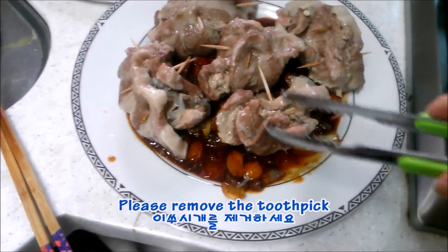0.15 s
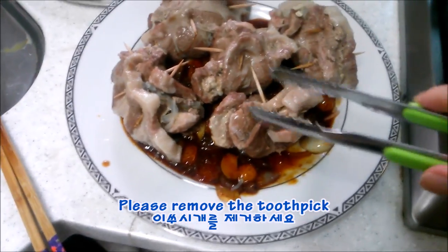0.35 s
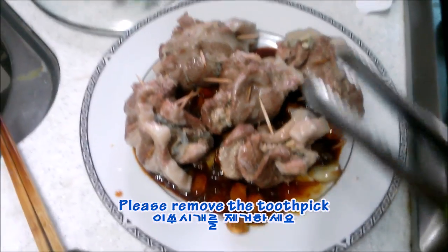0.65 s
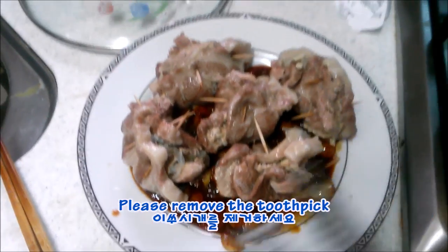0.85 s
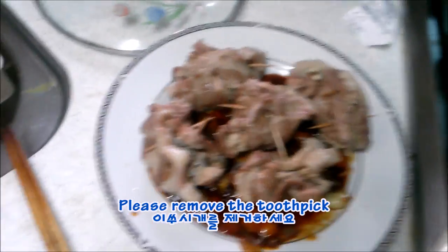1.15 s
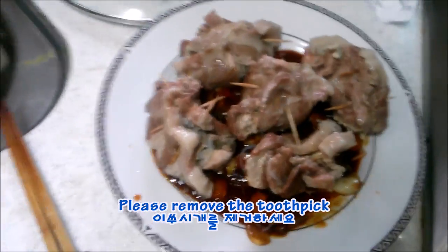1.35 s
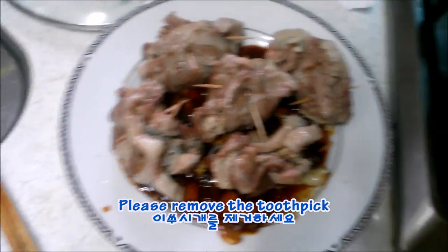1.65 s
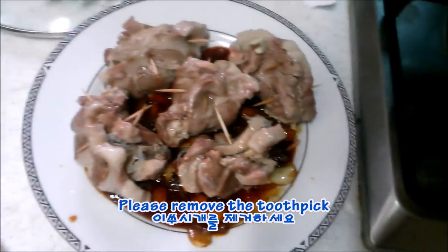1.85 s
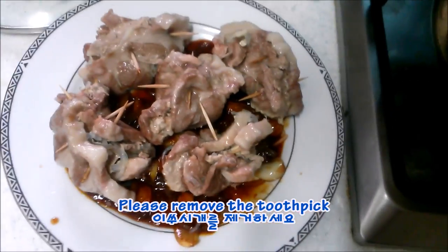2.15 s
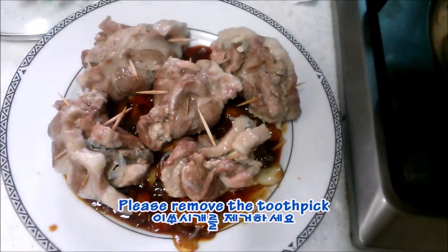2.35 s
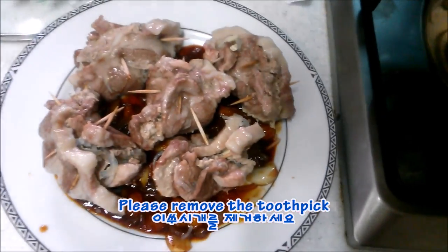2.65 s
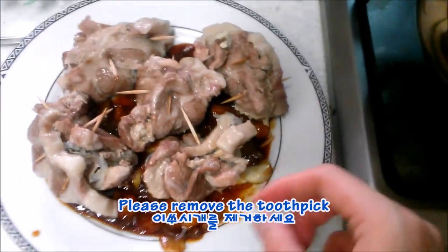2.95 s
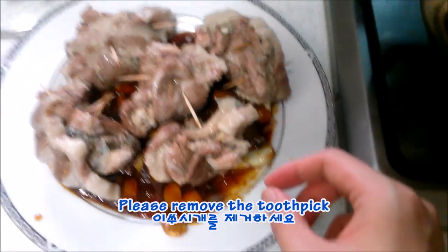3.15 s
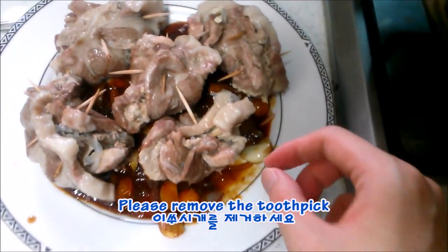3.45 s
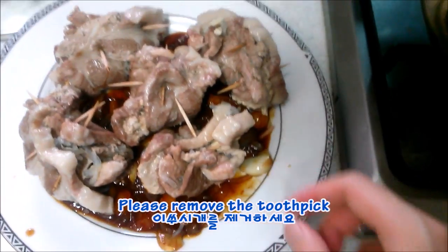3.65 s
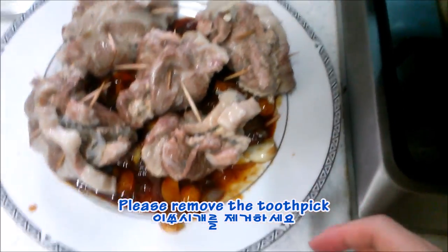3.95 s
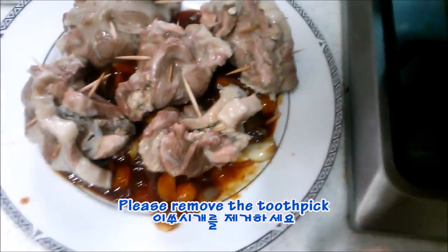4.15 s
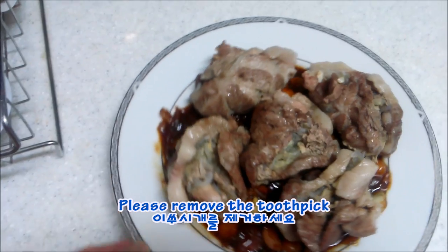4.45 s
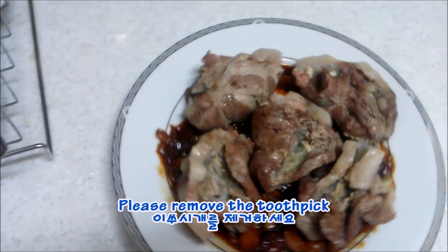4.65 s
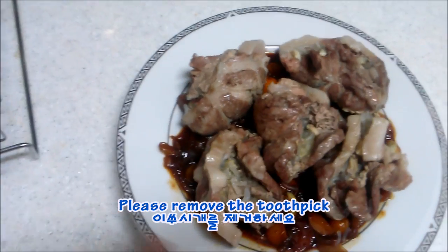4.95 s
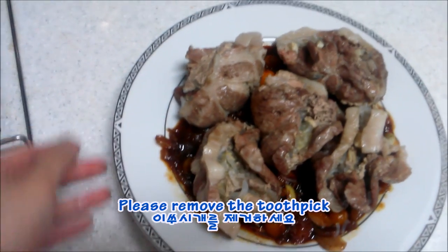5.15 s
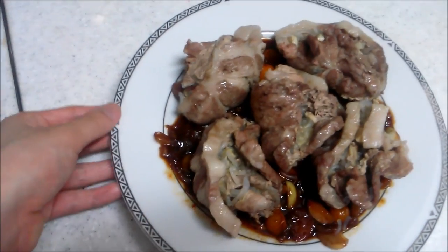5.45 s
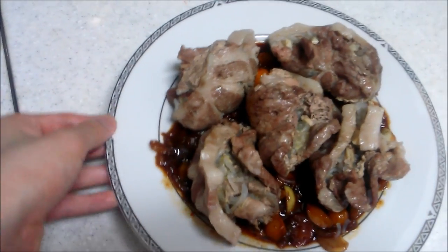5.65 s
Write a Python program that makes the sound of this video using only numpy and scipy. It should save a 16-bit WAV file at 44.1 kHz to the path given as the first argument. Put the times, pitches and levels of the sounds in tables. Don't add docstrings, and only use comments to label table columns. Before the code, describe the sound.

A small, hard-surfaced kitchen heard through a close handheld microphone, with steady fridge hum and soft low rumble from a moving hand. A small bright metal tick comes at 0.16 s and a dull double click of tongs near 0.55 s. A faint airy swish passes around 1.2 s. At 1.7 s the tongs drop lightly, followed by irregular clacks until about 2.4 s, and a few tiny ticks at 2.6-2.7 s. It stays quiet, with one soft touch near 3.8 s. At 4.12 s the scene cuts to a thinner room: dry snaps, then a heavy plate lands at 4.18 and 4.22 s with short woody booms. It drags, gritty and increasingly singing, from 4.3 to 4.85 s. Loud, hard ceramic knocks rattle at 5.09-5.16 s, a sharp clink follows at 5.29 s, then a fading scrape until 5.56 s, a tiny slip at 5.6 s, and faint hiss.

```python
import sys
import numpy as np
from scipy import signal
from scipy.fft import rfft, irfft
from scipy.io import wavfile
from scipy.ndimage import uniform_filter1d

SR = 44100
rng = np.random.default_rng(int(sys.argv[2]) if len(sys.argv) > 2 else 0)


def pcm_store(signal):
    levels = np.round(np.clip(np.atleast_2d(signal), -1, 1) * 32767)
    wavfile.write(sys.argv[1], SR, levels.astype(np.int16).T)


def to_linear_factor(level_db):
    exponent = np.asarray(level_db, float) / 20
    return 10 ** exponent


N = 256485
CHANGE_S = 4.12

# start in seconds, peak in dB, bass shelf in dB, treble shelf in dB,
# echo decay time T60 in seconds.
TONG_TICKS = [
    (0.159, -35, -5.5, -3.5, 0.61),
    (0.5744, -48.5, 11, -20, 0.39),
    (1.9728, -41.5, -2, -16, 1),
    (2.6427, -41.5, -13, -15, 0.59),
    (3.7728, -48.5, -2, -43, 0.46),
]
TONG_CLACKS = [(1.776, -42, -2, -14, 0.086), (1.7805, -37, -2.5, -4, 0.19), (1.803, -46.5, -2, -18, 0.22),
               (1.8565, -39.5, -8, -9, 0.48), (1.919, -46, -6, -13, 0.2), (1.926, -44, -6, -12, 0.18),
               (1.934, -35.5, -10, -19, 0.17), (1.943, -40.5, -3, -20, 0.11), (1.97, -35, -6, -10.5, 0.12),
               (1.984, -42, 2, -17, 0.18), (2.072, -30, -19, -21.5, 0.13), (2.089, -37, -5, -26, 0.29),
               (2.153, -47, -4, -12.5, 0.76), (2.335, -42, -2.5, -26, 0.081),
               (2.367, -33, -13.5, -28, 0.23)]
TONG_PINCHES = [
    (0.522, -48.5, -4, 2, 0.21),
    (0.527, -40.5, -11, -5, 0.3),
]
TONG_DROP = [
    (1.706, -32, -1, 2.9, 0.25),
    (1.7095, -33.5, 0.5, 3.5, .2),
    (1.7165, -36.5, 3, -2, 0.19),
    (1.73, -42, -1.5, 0, .2),
]
TONG_FLICK = [
    (2.7178, -51, 0, 0, 0.82),
    (2.7182, -52.5, 0, 0, 0.06),
]
# start in seconds, peak in dB, bass shelf in dB,
# treble shelf in dB, echo decay time T60 in seconds.
PLATE_THUDS = [
    (4.177, -15.5, 1.8, 4.2, 0.2),
    (4.217, -24, -0.29, 4.8, 0.2),
    (4.2245, -20, 0.33, 4.8, 0.196),
    (4.237, -23, -2, 4.3, 0.18),
    (4.262, -31.5, -1.8, 2.2, 0.69),
    (5.152, -26.5, 2, 2.2, 0.19),
]
SOFT_TOUCHES = [
    (1.491, -48.5, 5.5, -28, 0.19),
    (4.04, -62, 9, -26, 0.91),
    (4.964, -47, -9, -30, 0.35),
    (5.047, -57.5, 9.5, -30, .3),
    (5.071, -53.5, -14, 11, .2),
]
PLATE_KNOCKS = [
    (4.461, -44, -7, 10, 0.16),
    (4.51, -43, -8, 12, 0.11),
    (4.844, -37, -11, -3.5, 0.3),
    (5.092, -24.5, -1, 10, 0.28),
    (5.099, -21, -4, 7, 0.22),
    (5.108, -21.5, -21, -8, 0.23),
    (5.146, -15.5, -15, -7, 0.043),
]
EDGE_TAPS = [
    (5.2922, -25, -5.5, 1.4, 0.148),
    (5.405, -53, -12, 14, 0.057),
]
GRIT_CRACKS = [(4.4186, -42.5, -17, 5, 0.14), (4.455, -42.5, -6, 12, 0.31), (4.51, -43, -18, 13, 0.12),
               (4.6324, -49, -12, 5, 0.042), (4.6725, -57, -6, -4, .08), (4.395, -43, -9, 8, .06),
               (4.5, -48, -14, 6, .06), (4.545, -51, -14, 8, .06), (4.752, -53, -10, 3, .07),
               (4.7966, -54, -12, 8.1, 0.097), (4.8728, -42, -14, 1, 0.085), (4.893, -41.5, -8, -5, 0.076)]

# frequency in Hz, level in dB.
TICK_COLOUR = [(410, -18), (700, -4.5), (898, -12), (1140, -9), (1420, -6), (2560, -9.5), (4610, -8.5),
               (8310, -4.5), (10200, -15), (11300, -20), (16000, -29)]
CLACK_COLOUR = [(88, -2), (150, -8), (309, 0.5), (534, -4.5), (689, -2.5), (1260, -8.5), (1690, -1.5),
                (2700, -9), (4000, -17.5), (4490, -15.5), (16000, -42)]
FLICK_COLOUR = [(300, -40), (1300, -1), (3500, -3), (5600, -9.5), (6700, -4), (7900, -5), (9200, -17),
                (16000, -28)]
THUD_COLOUR = [(15, -46), (25, 3), (60, 5.5), (108, -1.5), (145, -21), (180, 1.5), (263, -3.5), (317, 1.5),
               (384, -6), (463, -5), (2050, -14.5), (4490, -13.5), (7920, -18), (16000, -47.5)]
KNOCK_COLOUR = [(35, -48.5), (60, 5.5), (862, -0.5), (991, -5.5), (1310, 6), (2000, -7), (3190, 1.5),
                (3760, -4.5), (6900, -6.5), (11300, -24.5), (14900, -28), (16000, -45)]
DRAG_COLOUR = [(88, -57), (150, -34), (259, 6), (297, -6), (406, 0.5), (475, -13), (660, -4.5), (900, 1),
               (1100, -2.5), (1450, -3.5), (4860, -2), (16000, -20.5)]
KITCHEN_COLOUR = [(35, -2.5), (60, -2.5), (81, -20.5), (118, -28), (146, -14.5), (363, -9), (398, -14),
                  (732, -19), (1090, -16), (1700, -20), (3040, -26), (3420, -25.5), (16000, -50.5)]
QUIET_COLOUR = [(35, -29), (60, 4), (281, -12.5), (400, -7), (660, -20.5), (950, -10), (1200, -18.5),
                (1470, 1.5), (1700, -9), (2140, -7), (3040, -10.5), (7940, -2.5), (16000, -31)]

# frequency in Hz, width in Hz, level in dB.
TONG_MODES = [(4600, 200, -4), (4970, 320, -13), (7130, 77, -1), (8140, 150, -1.5), (8600, 38, 8),
              (7900, 360, -38), (7800, 140, -5)]
COUNTER_MODES = [(326.4, 13, 5), (489, 13, 4.5), (683, 12, 4.5), (1121, 15, 0.5), (1590, 58, 0.5),
                 (2006, 110, -4.5), (2930, 40, -7), (3160, 120, -9.5)]
HINGE_MODES = [(785, 20, 0), (1260, 79, -9), (1550, 46, -1), (2116, 48, 0), (2840, 40, -8), (3870, 67, -16),
               (5450, 80, -19), (6800, 50, -24)]
HANDLE_MODES = [(309, 20.5, 8), (665, 18, 4.5), (1710, 32, -13), (2040, 58, -2), (2410, 37, -10),
                (2690, 47, -3), (3060, 39, -1.5), (4440, 100, -12), (5080, 39, -13), (5980, 34, -14),
                (7030, 79, -15.5), (8400, 58, -23)]
TIP_MODES = [(3380, 70, -2), (4000, 200, -4), (7190, 65, 4), (7700, 90, 0)]
TABLE_MODES = [(189.6, 17, 7), (316.7, 14, 6.5), (472, 16, 3), (554, 27, -4), (729, 28, -1.5), (883, 20, 2),
               (1188, 16, -1), (1377, 22, -6)]
PLATE_MODES = [(592, 30, -5), (835, 35, -5), (1170, 50, -4), (1290, 60, -2), (1445, 50, -7), (2385, 45, -7),
               (2923, 35, -6), (3138, 40, 0), (3446, 40, -1), (3940, 35, -7), (4440, 35, -9),
               (5460, 50, -4), (6800, 60, -12), (7810, 50, -10)]
EDGE_MODES = [(1113, 61, -2.5), (1710, 40, -5.5), (2730, 70, 1), (3140, 54, -0.5), (3700, 65, -11),
              (4060, 81, -6), (5090, 98, -7), (5920, 60, -6), (6950, 190, -8.5)]
GRIT_MODES = [(6080, 140, 0), (6580, 120, 5), (7300, 120, 1), (8700, 100, -2), (9330, 140, -1)]
FRIDGE_MODES = [
    [361, 12, -4.5],
    [1094, 50, -2],
    [3090, 63, -14],
    (7170, 1080, -22.5),
]
# frequency in Hz, width in Hz, level in dB.
FOOT_MODES = [(192, 14, 1), (231, 12, -2.5), (315.4, 30, 0), (548, 36, -8.5), (693, 38, -1), (845, 21, -13),
              (1210, 27, -11.5)]
SLAB_MODES = [(121.6, 10.7, 2), (186, 12, -1.5), (231, 15, -3), (317, 14, -1), (466, 15.7, -2),
              (552, 12, -8), (730, 26, -10), (885, 18, -5), (907, 18, -5)]
GLAZE_MODES = [(1156, 40, -12), (1323, 32, -9), (1484, 52, -11), (2380, 45, -9), (2920, 35, -4),
               (3133, 40, 1.5), (3280, 35, -5), (3438, 30, 0), (3950, 60, -8), (5500, 58, -8.5),
               (7010, 90, -7), (2696, 35, -7), (4790, 45, -7), (5020, 31, -4)]
DISH_MODES = [(584, 23, 0), (728, 25, -5), (845, 40, -3), (1000, 45, -6), (1160, 40, 0), (1293, 74, 2.5),
              (1410, 50, -4), (404, 43, 0), (1657, 45, 0.5), (2180, 35, -9), (4200, 40, -6)]
LIP_MODES = [(1110, 190, -6.5), (2690, 110, 1), (3080, 76, -8), (4150, 140, -6), (5100, 180, -7.5),
             (5830, 230, -9), (6780, 300, -11)]
SHRILL_MODES = [(15150, 60, 0), (15400, 80, -4)]
# frequency in Hz, width in Hz, level in dB.
RIM_MODES = [
    [(990, 60, -6), (1550, 260, 3), (2000, 220, 0), (3720, 170, 1), (4900, 220, 1), (5880, 150, 0),
     (7150, 170, 0), (8650, 140, 0), (10400, 300, -11)],
    [(1490, 150, -2), (3160, 120, 0), (4720, 200, -4)],
    [(1500, 200, -8), (2750, 160, 1), (6600, 2500, -8)],
    [(6500, 2500, 0)],
]

# start in seconds, peak in dB, push length in ms.
SETTLES = [
    (4.178, -26, 0.66),
    (4.1815, -23.5, 0.62),
    (4.186, -30.5, 1),
    (4.195, -31.5, 0.4),
    (4.208, -26, 0.38),
]
LANDS = [
    (4.221, -38, .5),
    (4.2255, -27, 0.78),
    (4.2285, -24, 1.5),
    (4.236, -35, 1.8),
    (4.245, -31, 0.52),
    (4.268, -28.5, 0.88),
    (5.163, -31, 0.44),
    (5.173, -34.5, 0.89),
]
CHATTERS = [(5.0925, -23.5, 0.07), (5.099, -21, 0.058), (5.104, -24, 0.15), (5.107, -20, 0.08),
            (5.1115, -22, 0.075), (5.121, -21, 0.14), (5.125, -26, 0.1), (5.134, -29, 0.12),
            (5.1475, -29, .1), (5.151, -34, .1), (5.193, -38, 0.11), (4.845, -39, 0.073),
            (4.858, -41, 0.34)]
WOBBLES = [
    (5.093, -30.5, .3),
    (5.103, -39, .3),
    (5.116, -28.5, 0.2),
    (5.129, -26, 0.26),
    (5.137, -32, 0.34),
    (5.143, -31, 0.38),
    (5.154, -24.5, 0.27),
    (5.16, -33, 0.51),
]
CLINKS = [
    (5.2926, -19.5, 0.075),
    (5.2941, -23.5, .07),
    (5.2985, -30, .1),
    (5.3015, -21, 0.16),
    (5.309, -30, 0.11),
    (5.3135, -35, .1),
    (5.3205, -36, 0.16),
]
WHISTLES = [
    (5.0925, -43, .05),
    (5.1, -47, .05),
    (5.108, -50, .05),
]
# start in seconds, peak in dB, pitch in Hz, T60 in seconds.
BOOMS = [
    (4.1833, -24, 104, 0.093),
    (4.2224, -22, 104.3, 0.1),
    (4.2631, -28, 112.4, 0.143),
]
# start in seconds, peak in dB, pitch in Hz.
SNAPS = [
    (4.1261, -45, 3500),
    (4.1458, -23, 4300),
    (4.1599, -38, 2500),
    (4.1658, -14, 4500),
]
# start in seconds, end in seconds, level in dB, sag in dB per second,
# brightness in dB.
DRAGS = [
    (4.288, 4.85, -47.5, -0.5, -8),
    (5.21, 5.3, -54, 44, 13.5),
    (5.324, 5.558, -52.5, 20, 5),
    (5.586, 5.612, -63.5, 10, 18),
]
# frequency in Hz, peak level in dB.
HUM_LINES = [(371.4, -66.5), (1104, -81), (1287, -79.5), (2950, -98), (3009, -79.5)]
# centre in seconds, peak in dB, width in seconds.
RUMBLE_SWELLS = [(.2, -56.5, 0.069), (.45, -52.5, 0.22), (.89, -55.5, 0.093), (1.3, -52.5, 0.15),
                 (1.55, -59, 0.19), (1.93, -56, 0.13), (2.21, -47.5, 0.098), (2.38, -60, 0.12),
                 (2.63, -56, 0.06), (3.22, -60, 0.052), (3.72, -61, 0.23), (4.25, -53, .06),
                 (4.42, -53, 0.087), (4.66, -52.5, 0.07), (5.17, -49, 0.11), (5.5, -64, 0.15),
                 (4.86, -66, 0.13)]
# centre in seconds, length in seconds, share of lines kept.
STARVED = [(.136, .042, .07), (.306, .035, .15), (.624, .04, .08), (.9, .036, .1), (1.63, .04, .1),
           (1.755, .035, .16), (1.842, .035, .3), (2.52, .04, .12), (3.012, .04, .1), (4.206, .028, .12),
           (4.293, .03, .12), (4.698, .03, .2), (4.839, .05, .16), (5.1045, .026, .09), (5.23, .03, .25),
           (5.34, .03, .25), (5.606, .05, .07), (5.765, .03, .2)]


def level(x, db):
    return x * to_linear_factor(db) / np.sqrt(np.mean(x ** 2) + 1e-20)


def gains_db(points, hz):
    f, db = np.transpose(points)
    return np.interp(np.log(hz + 1), np.log(f), db)


def colour(x, points):
    hz = np.arange(len(x) // 2 + 1) * SR / len(x)
    return irfft(rfft(x) * to_linear_factor(gains_db(points, hz)), len(x))


def band(x, low_hz, high_hz):
    return signal.sosfilt(signal.butter(2, [low_hz, high_hz], "bandpass", fs=SR, output="sos"), x)


def shelve(x, bass_hz, bass_gain, treble_hz, treble_gain):
    low = signal.butter(1, bass_hz, fs=SR)
    high = signal.butter(1, treble_hz, "high", fs=SR)
    for _ in range(2):
        x = x + (np.sqrt(bass_gain) - 1) * signal.lfilter(*low, x)
        x = x + (np.sqrt(treble_gain) - 1) * signal.lfilter(*high, x)
    return x


def ring(x, modes, scatter_db=0.):
    out = 0
    draws = rng.standard_normal((len(modes), 2))
    for (hz, width, db), (chance, side) in zip(modes, draws):
        r = np.exp(-np.pi * max(width, 5) / SR)
        w = 2 * np.pi * hz / SR
        gain = np.sign(side) * to_linear_factor(db + scatter_db * chance)
        out = out + gain * signal.lfilter([1 - r, 0, r - 1], [1, -2 * r * np.cos(w), r * r], x)
    return out


def walk(rate, size=N):
    hold = int(SR / rate)
    steps = np.repeat(rng.standard_normal(size // hold + 1), hold)
    return 0.83 * uniform_filter1d(steps, hold)[:size]


def kitchen():
    t = np.arange(N) / SR
    first = level(colour(rng.standard_normal(N), KITCHEN_COLOUR), 0)
    first += level(ring(rng.standard_normal(N), FRIDGE_MODES), -10.0)
    first *= to_linear_factor(-61 - 0.5 * t + 0.84 * walk(4.96))
    for hz, db in HUM_LINES:
        first += to_linear_factor(db + 1.5 * walk(9)) * np.sin(2 * np.pi * hz * t + .7 * walk(14))
    swish = level(band(rng.standard_normal(N), 1600, 6900), -69.5)
    first += swish * np.exp(-((t - 1.23) / 0.32) ** 2)

    second = level(colour(rng.standard_normal(N), QUIET_COLOUR), 0)
    linger = to_linear_factor(-47 - 45 * (t - CHANGE_S))
    late_rise = to_linear_factor(-63 - 8.5 * (t[-1] - t))
    lull = to_linear_factor(-6 * np.exp(-((t - 5.733) / 0.012) ** 4))
    second *= (linger + late_rise) * lull * to_linear_factor(1.0 * walk(7.1))
    reopen_s = .026
    return np.where(t < CHANGE_S + reopen_s, first, second)


def rumble():
    calm_db, calm_after_db, upper_bass_db = -66, -75, -69
    t = np.arange(N) / SR
    calm = np.where(t < CHANGE_S, 1, to_linear_factor(calm_after_db - calm_db))
    swell = to_linear_factor(calm_db) * calm
    for s, db, width in RUMBLE_SWELLS:
        swell += to_linear_factor(db) * np.exp(-((t - s) / width) ** 2)
    still = np.interp(t, [CHANGE_S - .02, CHANGE_S, CHANGE_S + .055, CHANGE_S + .1], [1, .03, .03, 1])
    deep = level(band(band(rng.standard_normal(N), 18.7, 35.6), 18.6, 98), 0)
    upper = level(band(rng.standard_normal(N), 45, 140), 0) * to_linear_factor(2.5 * walk(9))
    groan = to_linear_factor(-67) * np.exp(-((t - 5.47) / 0.1) ** 4)
    upper_gain = to_linear_factor(upper_bass_db) * calm + 0.085 * swell + groan
    hiss = level(band(rng.standard_normal(N), 7300, 21000), -99.5)
    hiss += level(band(rng.standard_normal(N), 13500, 18000), -85)
    return still * (swell * deep + upper_gain * upper) + hiss


def blows(events, points, modes, ring_db, contact_s, edge_hz, bass_stay, bass_late_s, gain_db):
    out, size = np.zeros(N + SR), 2 ** 15
    t = np.arange(size) / SR
    end_fade = np.minimum(10 * (1 - t / t[-1]), 1)
    for s, db, bass_db, treble_db, t60 in events:
        fade = np.maximum(t - contact_s, 0) / max(t60, .02)
        rattle = to_linear_factor(-60 * fade) * (1 - np.exp(-t / 0.00039)) * (1 + 0.42 * np.exp(-t / 0.00094))
        late = (1 - np.exp(-t / max(bass_late_s, .0005))) * to_linear_factor(-60 * fade / bass_stay)
        noise = level(colour(rng.standard_normal(size), points), 0)
        bass = signal.lfilter(*signal.butter(1, 700, fs=SR), noise)
        echo = bass * late + (noise - bass) * rattle
        bounces = rng.standard_normal(size) * (rng.random(size) < .012) * to_linear_factor(-90 * fade)
        bounces[5] += 2.5
        body = band(ring(bounces, modes, scatter_db=1.5), 40, 1.3 * modes[-1][0])
        body *= to_linear_factor(ring_db) * np.sqrt(np.sum(echo ** 2) / np.sum(body ** 2))
        sound = shelve(echo + body, 910, to_linear_factor(bass_db), edge_hz, to_linear_factor(treble_db))
        i = int((s + .0004) * SR)
        out[i:i + size] += to_linear_factor(db + gain_db) * end_fade * sound
    return out[:N]


def tongs():
    out = blows(TONG_TICKS, TICK_COLOUR, TONG_MODES, ring_db=-11.5, contact_s=0.0039, edge_hz=4000,
                bass_stay=0.26, bass_late_s=0.0038, gain_db=-11.5)
    out += blows(TONG_PINCHES, CLACK_COLOUR, HINGE_MODES, ring_db=5.5, contact_s=0.024, edge_hz=3800,
                 bass_stay=0.62, bass_late_s=.008, gain_db=-13.0)
    out += blows(TONG_DROP, CLACK_COLOUR, HANDLE_MODES, ring_db=3.0, contact_s=0.006, edge_hz=3300,
                 bass_stay=1.8, bass_late_s=0.014, gain_db=-12.5)
    out += blows(TONG_CLACKS, CLACK_COLOUR, COUNTER_MODES, ring_db=-1.0, contact_s=0.0068, edge_hz=1080,
                 bass_stay=2.6, bass_late_s=0.016, gain_db=-5.5)
    out += blows(TONG_FLICK, FLICK_COLOUR, TIP_MODES, ring_db=-3.5, contact_s=0.0093, edge_hz=3500,
                 bass_stay=1.0, bass_late_s=.004, gain_db=-7)
    return out


def plate():
    out = blows(PLATE_THUDS + SOFT_TOUCHES, THUD_COLOUR, TABLE_MODES, ring_db=-5.0, contact_s=0.015,
                edge_hz=2100, bass_stay=1.63, bass_late_s=0.0034, gain_db=-12.0)
    out += blows(GRIT_CRACKS, TICK_COLOUR, GRIT_MODES, ring_db=-3.5, contact_s=0.0035, edge_hz=11000,
                 bass_stay=0.99, bass_late_s=0.0036, gain_db=-9)
    out += blows(PLATE_KNOCKS, KNOCK_COLOUR, PLATE_MODES, ring_db=-0.5, contact_s=0.0056, edge_hz=3500,
                 bass_stay=1.5, bass_late_s=0.029, gain_db=-10.0)
    out += blows(EDGE_TAPS, KNOCK_COLOUR, EDGE_MODES, ring_db=2.0, contact_s=0.0026, edge_hz=2700,
                 bass_stay=1.44, bass_late_s=0.0061, gain_db=-10.0)
    return out


def snaps():
    out, t = np.zeros(N), np.arange(400) / SR
    for s, db, hz in SNAPS:
        envelope = np.exp(-((t - .0002) / .00008) ** 2) + .25 * np.exp(-t / .0006)
        click = np.sin(2 * np.pi * hz * t) * envelope
        click += 0.13 * rng.standard_normal(len(t)) * np.exp(-t / 0.0015)
        i = int(s * SR)
        out[i:i + len(t)] += to_linear_factor(db) * click
    bump_s, deepest_s, bump_db = 4.1255, .0062, -27
    u = np.maximum(np.arange(N) / SR - bump_s, 0) / deepest_s
    return out - to_linear_factor(bump_db) * u * u * (1.3 * np.exp(1.5 - 1.5 * u) - .3 * np.exp(-.6 * u))


def strikes(events, modes):
    out, t = np.zeros(N + SR), np.arange(8192) / SR
    for s, db, push_ms in events:
        push = np.sin(np.pi * np.minimum(1000 * t / max(push_ms, .05), 1))
        body = ring(push, modes, scatter_db=1.5) * np.cos(np.pi / 2 * t / t[-1])
        i = int(s * SR)
        out[i:i + len(t)] += to_linear_factor(db) * body / np.abs(body).max()
    return out[:N]


def contacts():
    out = strikes(SETTLES, FOOT_MODES) + strikes(LANDS, SLAB_MODES)
    out += strikes(CHATTERS, GLAZE_MODES) + strikes(WOBBLES, DISH_MODES)
    return out + strikes(WHISTLES, SHRILL_MODES) + strikes(CLINKS, LIP_MODES)


def booms():
    t, out = np.arange(N) / SR, np.zeros(N)
    for s, db, hz, t60 in BOOMS:
        age = np.maximum(t - s, 0)
        out += to_linear_factor(db - 60 * age / t60) * np.sin(2 * np.pi * hz * age)
    return out


def drags():
    attack_s, release_s = 0.035, 0.075
    boom_db, settled_db, settle_s = 18.5, -2.5, 0.076
    rim_db, rim_rise_db_per_s = -1, 13
    first = int(CHANGE_S * SR)
    out, t, n = np.zeros(N), np.arange(first, N) / SR, N - first
    sliding = np.maximum(t - DRAGS[0][0], 0)
    bass_db = settled_db + (boom_db - settled_db) * np.exp(-sliding / settle_s)
    for (start, end, db, sag_db, bright_db), rim in zip(DRAGS, RIM_MODES):
        age = np.maximum(t - start, 0)
        edges = np.maximum(start - t, 0) / attack_s + np.maximum(t - end, 0) / release_s
        slip_db = 2.5 * np.minimum(rng.exponential(size=n), 5) + 2.2 * walk(50, size=n)
        slips = rng.standard_normal(n) * to_linear_factor(slip_db)
        song = sum(ring(slips[::-1] * to_linear_factor(4.5 * walk(28, size=n)), [mode]) for mode in rim)
        rise = to_linear_factor(rim_rise_db_per_s * np.minimum(age, .45))
        rub = level(colour(slips, DRAG_COLOUR), 0) + level(song, rim_db) * rise
        rub /= np.sqrt(1 + rise ** 2)
        gain = to_linear_factor(db - sag_db * age - 20 * np.minimum(edges, 6))
        treble_gain = to_linear_factor(bright_db + 1.4 * walk(13, size=n))
        out[first:] += gain * shelve(rub, 770, to_linear_factor(bass_db), 3600, treble_gain)
    return out


def scene():
    return (kitchen() + rumble() + tongs() + snaps() + plate() + contacts() + booms() + drags())[None]


def starve(x):
    depths, tilts = (.88, .98, .95), (.6, .3, .5)
    out = x.copy()
    for s, length, share in STARVED:
        size = int(length * SR)
        i = int(s * SR) - size // 2
        window = np.sin(np.pi * (np.arange(size) + .5) / size) ** .5
        lines = rfft(x[i:i + size] * window)
        loud = np.std(x[i:i + size]) > to_linear_factor(-47)
        kind = 2 if loud else int(s > CHANGE_S)
        weight = np.abs(lines) * (np.arange(len(lines)) + 8.) ** tilts[kind]
        lost = weight < np.quantile(weight, 1 - np.clip(share, .01, .9))
        bass_end = int(180 * length)
        lost[:bass_end] = False
        if loud:
            lost[int(14700 * length):] = False
        change = -1. * lost
        if kind:
            kept, low = min(2 * share, .9), slice(bass_end, int(8700 * length))
            power = np.abs(lines) ** 2
            peaks = power > -np.log(kept) * uniform_filter1d(power, int(700 * length))
            change[low] = peaks[low] / np.sqrt(kept * (1 - np.log(kept))) - 1
        out[i:i + size] += depths[kind] * window * irfft(lines * change, size)
    return out


def top_cut(x):
    return signal.sosfilt(signal.butter(12, 16850, fs=SR, output="sos"), x)


def record(dry):
    def low_pass(hz):
        return signal.sosfiltfilt(signal.ellip(9, .1, 50, hz, fs=SR, output="sos"), dry[0])

    t = np.arange(N) / SR
    loud = ((t > 4.142) & (t < 4.172)) | ((t > 5.088) & (t < 5.105))
    limited = np.where(loud, low_pass(16700), low_pass(15800))
    return top_cut(starve(limited)[None])


dry = scene()
out = record(dry)
pcm_store(out)
```